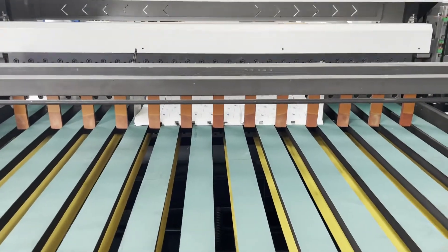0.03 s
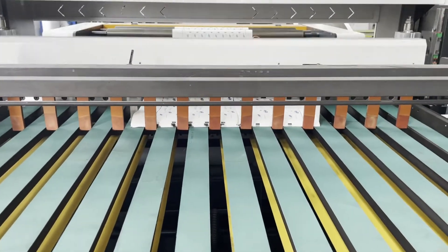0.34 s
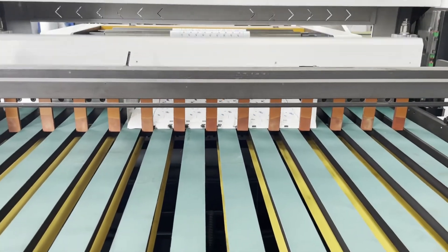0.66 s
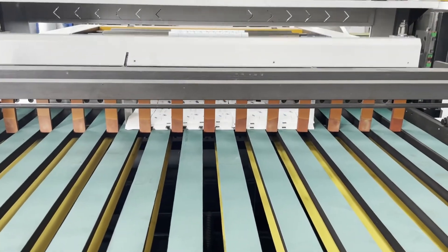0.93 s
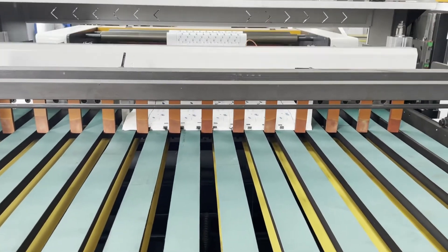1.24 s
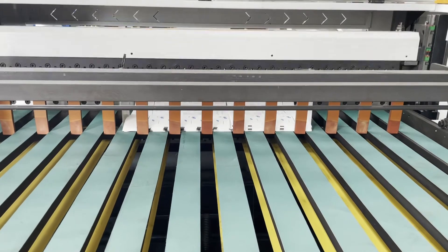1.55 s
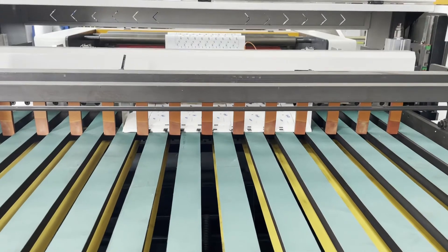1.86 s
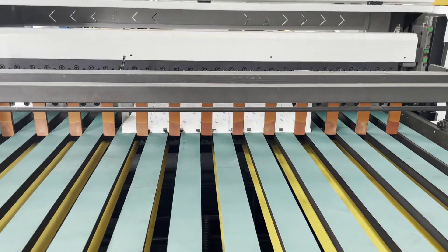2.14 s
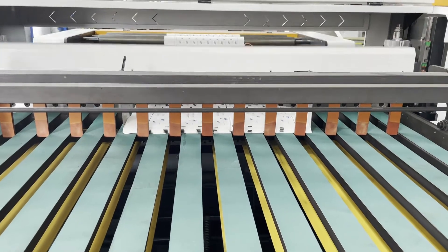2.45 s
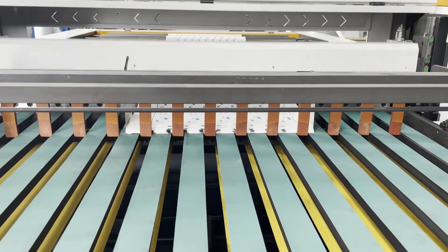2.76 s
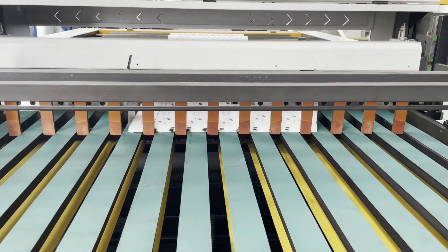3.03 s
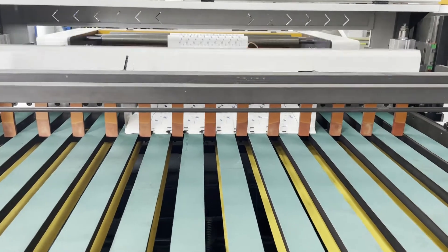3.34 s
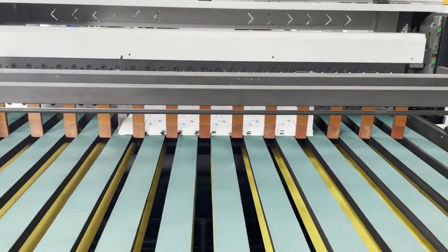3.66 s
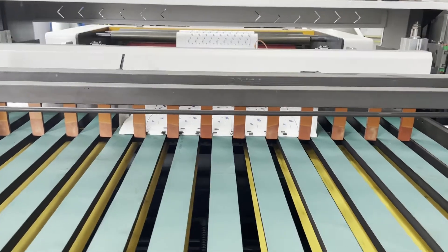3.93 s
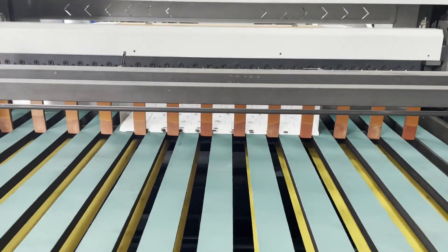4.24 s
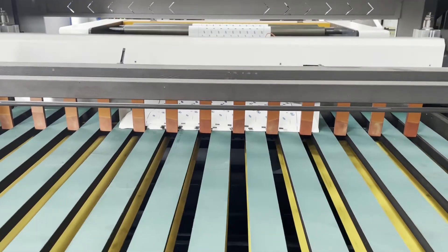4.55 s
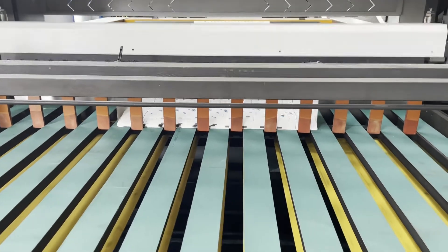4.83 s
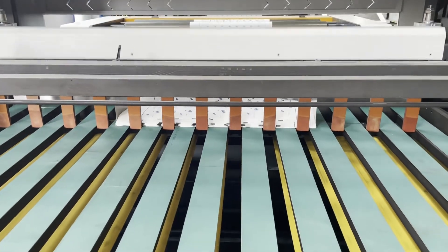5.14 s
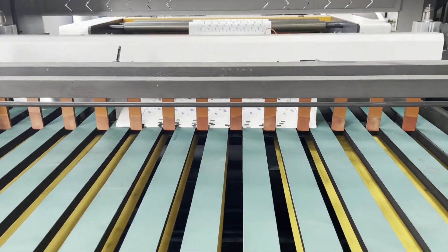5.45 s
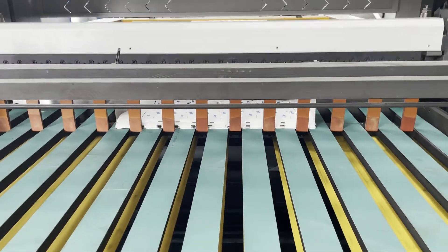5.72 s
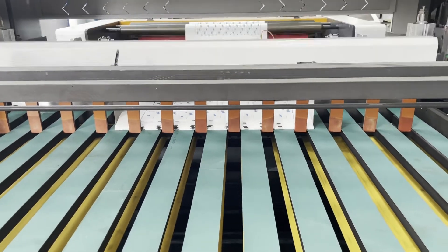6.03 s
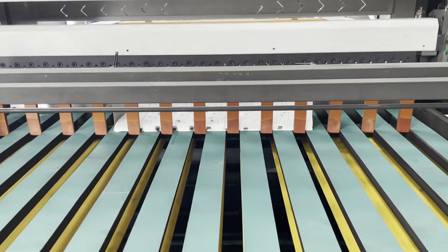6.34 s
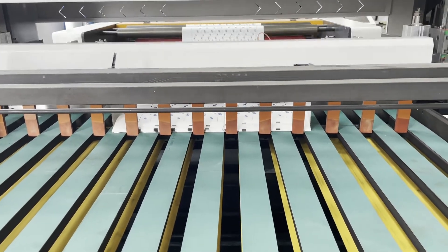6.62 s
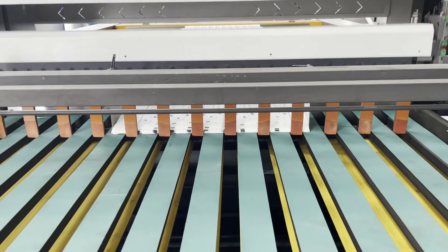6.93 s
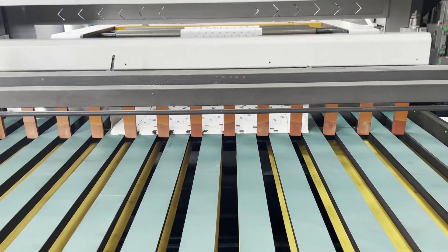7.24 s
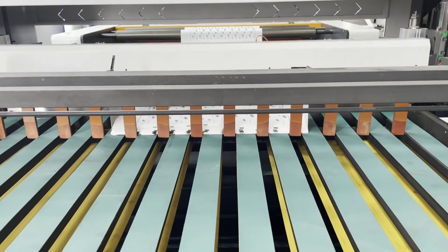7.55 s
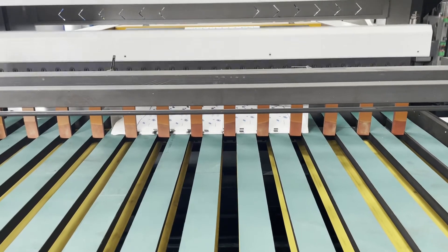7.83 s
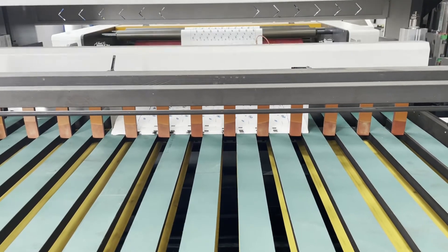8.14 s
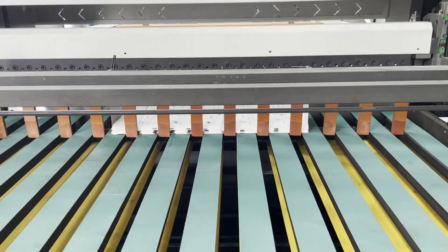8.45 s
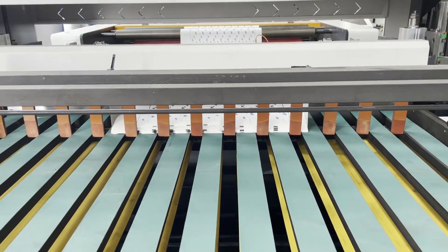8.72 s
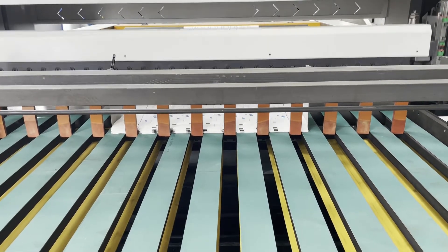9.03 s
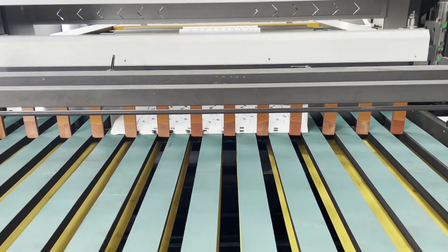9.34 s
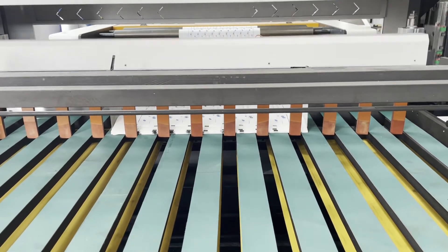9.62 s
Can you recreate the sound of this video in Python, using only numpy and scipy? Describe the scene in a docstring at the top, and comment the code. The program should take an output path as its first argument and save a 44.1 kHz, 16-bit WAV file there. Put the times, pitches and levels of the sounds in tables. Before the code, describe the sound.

A sheet cutting press runs in a factory hall, heard close to its delivery belts. Gears drone and the frame hums while strokes come almost twice a second, each thumping, clattering and swishing a sheet out as a valve hisses. A brief note sings at two seconds. Near four a sheet rasps and the drone firms up. At the end an air jet swells, a roller squeals and metal parts chirp.

```python
"""A sheet cutting press runs in a factory hall, almost two strokes a second, close by its delivery belts.
From the start gears drone and the frame hums; each stroke thumps, clatters through the cut and throws
a sheet out, while a valve switches air. At 2 s a brief note sings. Near 4 s a sheet rasps along its
guides and the drone firms up. At the end an air jet swells, a dry roller squeals and metal parts chirp."""
import sys
import numpy as np
from scipy.fft import rfft, irfft, next_fast_len
from scipy.io import wavfile
from scipy.ndimage import map_coordinates

SR = 44100
rng = np.random.default_rng(int(sys.argv[2]) if len(sys.argv) > 2 else 0)


def materialize(psi):
    """Save the field psi as 16-bit PCM at rate SR to the path in sys.argv[1].

    A 1-D psi becomes a single channel; in a 2-D psi each row is a channel.
    """
    bounded = np.clip(np.atleast_2d(psi).T, -1, 1)
    quanta = np.round(bounded * 32767).astype(np.int16)
    wavfile.write(sys.argv[1], SR, quanta)


N = 435708
TIME = np.arange(N) / SR
STROKE_S, FIRST_STROKE_S = .52708, .42
CUT_S, RELEASE_S = .14, .185  # into the stroke: the middle of the cut, the platen letting go

# Strokes of the platen: t/s, thump/dB, cut force/dB, cut length/s, guard ring in the cut/dB,
# guard ring on release/dB, paper swish/dB, gripper snap/dB, extra gear jolt/dB
STROKES = [(-0.107, -24, -1, .02, -25.5, -40, 0, -4, -3), (0.42, -21.5, 0.5, .025, -33, -37, -1.4, -4, 4),
           (0.947, -22, -1.5, .02, -25, -28, 0.5, -1.5, -3), (1.474, -22, 0, .03, -31, -29, -1, -2, 0.5),
           (2.001, -23, 1.5, .03, -31, -35, -2, -1.5, 2),
           (2.529, -25.5, -0.5, .03, -25, -30, -0.5, -2.5, -9),
           (3.055, -24, 0, .035, -25.5, -21.5, -3, -1, 4.5), (3.582, -22, -3, 0.042, -27, -29, -1, -0.5, 0),
           (4.111, -21, -.5, 0.041, -19, -28, -1.5, 0, 2.5),
           (4.637, -21.5, .5, .05, -34, -29, 1.5, -1, 0.5), (5.164, -21, 0, 0.056, -25, -34, -1, -2, -1),
           (5.691, -20, 0, 0.067, -22.5, -28, 0, 0, 2), (6.218, -22, -.5, .065, -24, -29, 2.5, -1.5, -2),
           (6.745, -23, 2, .07, -22.5, -30, 0.5, -1.5, 1), (7.271, -25.5, 2.5, 0.057, -24, -29, -.5, 0, 0),
           (7.8, -21.5, 1.5, 0.045, -25.5, -41, -0.5, -1.5, 1),
           (8.326, -22, 2, .06, -20.5, -31, -0.5, 0.5, 0),
           (8.852, -20.5, 2.5, 0.042, -18.5, -34, -.5, -1, -2.5),
           (9.379, -23.5, 2, 0.062, -23.5, -35, 0, 0, 0)]
# Cams jolt the gears as they go slack, take up the platen and drive it home (offsets count from the
# start of each stroke): offset/s, lift of the weak drone/dB, lift of the firm drone/dB, width/s
CAM_JOLTS = [(.012, -2.5, -6.5, .018), (.045, 3, 6, .02), (.11, -2, 3, .012), (.14, -12, -8, .013),
             (.178, 7.5, 5, 0.02)]
# Thuds of the heavy bed: offset/s, f/Hz, level over the thump/dB, rise/s, t60/s
BED_THUDS = [(.012, 92, -14, .012, .09), (.047, 84, -5, .013, 0.14), (.089, 108, -2, 0.0091, 0.092),
             (.088, 91, -1.5, 0.035, 0.53), (.14, 174.5, -5, 0.037, 0.32), (.185, 222, -9, 0.019, 0.29),
             (.27, 175.5, -8, 0.023, 0.28), (.358, 92, -11, .012, .1), (0.411, 100, -13.5, 0.056, 0.2)]
# Knocks on the guard: offset/s, f/Hz, level over the stroke's ring/dB, rise/s, t60/s
GUARD_KNOCKS = [(.116, 378.3, 1, 0.0075, 0.092), (.158, 405, -0.5, 0.019, 0.17),
                (.208, 400, -0.5, .018, .2), (.247, 387.5, 2.5, 0.019, 0.095)]
# Grippers and cams snap, the sheet slides out: offset/s, relative level/dB, rise/s, hold/s, t60/s
GRIPPER_SNAPS = [(.002, -6, .008, .004, .15), (0.352, -1.5, .007, .032, 0.09),
                 (0.476, -4.5, .005, .002, 0.078)]
# Sheets coming down on the belts: t/s, slap/dB, crackle/dB
LANDINGS = [(.265, -2, -9), (.792, -2, -3), (1.306, -7, -4), (1.836, -2, -9), (2.364, -2.5, -5),
            (2.884, -5, -3), (3.417, -5, -3), (3.955, -1, -4), (4.488, -4, -6), (5.015, -3, -2),
            (5.528, -7, -1), (6.062, -2, -6), (6.585, -5, -7), (7.115, -6, -4), (7.638, -2, -4),
            (8.175, -3, -4), (8.695, -6, -5), (9.225, -6, -5), (9.755, -4, -6)]
# Whirs of the sheet transport: offset/s, f/Hz, level/dB, width/s
WHIRS = [(.02, 612, -34.5, 0.025), (.19, 619, -37, 0.064)]
# Its groans, mostly on the return: t/s, width/s, f/Hz, level/dB
GROANS = [(.07, .05, 599, -34), (.25, 0.043, 670, -29), (.81, 0.049, 717, -29), (1.35, 0.07, 682, -36),
          (1.65, 0.057, 577, -29.5), (1.82, 0.091, 680, -29), (2.38, 0.055, 714, -30.5),
          (2.74, .05, 615, -28), (2.95, 0.097, 691, -31.5), (3.42, .08, 693, -34), (3.93, 0.1, 701, -33),
          (4.52, 0.045, 690, -28.5), (4.69, 0.038, 606, -29.5), (5.48, 0.1, 688, -27.5),
          (6.04, 0.1, 691, -32), (6.6, 0.072, 687, -31), (7.08, 0.086, 680, -30.5), (7.63, 0.062, 660, -27),
          (8.2, 0.078, 696, -33), (8.7, 0.085, 690, -36), (9.2, .09, 684, -29.5), (9.77, 0.074, 698, -35)]
# Whine of the motor's inverter: f/Hz, level/dB
INVERTER_TONES = [(4885, -63), (7558, -69), (7924, -62), (7972, -59), (7999, -61), (8031, -65), (8074, -65),
                  (8424, -68), (11886, -71), (12116, -72)]
# Edge tones of the air jet: f/Hz, relative level/dB
EDGE_TONES = [(3090, -47), (4480, -48), (6450, -51), (10070, -50), (10900, -48)]
# Surges of the dry roller: t/s, length/s, note/dB, octave/dB
SQUEALS = [(9.261, .018, -32.5, -54), (9.278, .035, -42, -39), (9.32, .04, -45, -42.5),
           (9.372, .04, -46, -40), (9.415, .025, -44, -47), (9.445, .035, -37, -46), (9.49, .038, -36, -47),
           (9.56, .05, -47, -52), (9.646, .035, -35.5, -57), (9.695, .03, -44, -55),
           (9.755, .025, -37, -50), (9.774, .04, -48, -42), (9.815, .025, -40, -49)]
# Metallic chirps: t/s, width/s, f/Hz, level/dB
CHIRPS = [(9.22, .02, 2260, -41), (9.68, .04, 6072, -48), (9.70, .05, 5566, -48), (9.72, .06, 6498, -49),
          (9.757, .013, 3074, -35), (9.81, .04, 4470, -45)]
# Resonances of the steel frame and its covers: f/Hz, width/Hz, lift/dB
COVER_MODES = [(94.5, 11, 2), (172, 25, 6.5), (342, 17, 4), (692, 59, 5), (852, 22, 6.5), (943, 35, 4.5),
               (1307, 7, 5.5), (1440, 12, 0.5), (1992, 32, 3.5), (2290, 140, 2.5), (3930, 340, 4),
               (4880, 19, 6)]
# Tone colours of the noise layers: f/Hz, spectral level/dB
DIE_EQ = [(60, -70), (120, -59), (230, -58), (290, -54.5), (400, -53.5), (520, -56.5), (800, -61),
          (1300, -59.5), (1900, -72), (3000, -75.5), (8000, -101), (15700, -110)]
SWISH_EQ = [(1200, -100), (2600, -86), (4000, -72), (6000, -76), (8500, -78.5), (12000, -84.5),
            (15700, -91)]
GRIPPER_EQ = [(100, -81), (400, -54), (900, -62.5), (1500, -67), (2300, -67), (3100, -70), (4000, -71.5),
              (6000, -77), (9000, -80), (15700, -96)]
SLAP_EQ = [(100, -75), (400, -68), (900, -56.5), (1500, -65.5), (2300, -74.5), (3100, -77), (4000, -78),
           (6000, -84), (9000, -92), (15700, -96)]
CRACKLE_EQ = [(600, -90), (1500, -64.5), (2300, -62), (3200, -73.5), (6000, -92), (15700, -110)]
VALVE_EQ = [(1000, -105), (4000, -96), (6500, -81.5), (7800, -83.5), (8800, -84), (10000, -83),
            (12000, -90), (14000, -83), (15700, -95)]
RASP_EQ = [(150, -75), (400, -50.5), (600, -59), (1050, -59.5), (1600, -67.5), (2200, -64.5), (3200, -84),
           (6000, -88), (15000, -100)]
JET_EQ = [(150, -70), (500, -47.5), (1200, -63), (2800, -65), (4200, -67.5), (7000, -69.5), (10000, -73),
          (13000, -78), (15700, -86)]
SHAFT_EQ = [(15, -104), (28, -92), (48, -55.5), (70, -54.5), (115, -52.5), (200, -55.5), (270, -54.5),
            (350, -50), (450, -55), (540, -64), (800, -75), (2000, -110)]
BELT_EQ = [(100, -71), (400, -68.5), (620, -56.5), (800, -64.5), (1150, -64), (1500, -65), (1800, -71),
           (2600, -70.5), (3300, -74.5), (4600, -75.5), (6000, -82.5), (8200, -87.5), (11500, -88.5),
           (15700, -97)]
# Likeness of left and right in the noise layers: f/Hz, correlation
STEREO_LIKENESS = [(25, .88), (70, .97), (140, .94), (330, .84), (500, .72), (1000, .56), (1900, .3),
                   (4000, .56), (6000, .6), (8000, .82), (15000, .87)]
# Phase between the sides: f/Hz, lead of the left/rad
STEREO_LEAD = [(1000, 0), (2240, -.6), (3190, .7), (3880, -.1), (4910, .4), (6200, -.2), (8100, -3.1),
               (9500, -4.4), (11500, -6.3), (15000, -9.4)]
# Balance of the sides: f/Hz, left minus right/dB
STEREO_BALANCE = [(60, -4), (110, 1.3), (200, -2.1), (380, -1.5), (700, 0.5), (1290, 0.9), (2380, 1),
                  (4400, 1), (8120, 2), (15000, -1)]


def gears(teeth_per_stroke=168, speed_swing=.0272, firm_at_s=4.04, firm_over_s=.37, shudder_hz=14.7):
    """The mesh tone sags and surges with the crank; cams jolt it and teeth rattle in their backlash."""
    starts, *_, home_db = np.transpose(STROKES)
    speed = np.cos(2 * np.pi * since(.3002) / STROKE_S)  # the crank slows for the cut, then picks up
    mesh_hz = teeth_per_stroke / STROKE_S * (1 + speed_swing * speed) + 1.15 * wobble(90)
    firm = np.clip((TIME - firm_at_s) / firm_over_s + .5, 0, 1)  # 0: weak and broken, 1: firm
    jolt_db = sum((weak_db + firm * (firm_db - weak_db)) * bump(at_s, width_s)
                  for at_s, weak_db, firm_db, width_s in CAM_JOLTS)
    jolt_db += np.interp(TIME, starts + .19, home_db) * bump(.19, .02)  # driving the platen home
    shudder = np.cos(2 * np.pi * shudder_hz * around(.1185))  # the shaft shakes around the cut
    shudder_db = 1.5 * bump(.1185, width_s=.29) * shudder
    backlash_db = (1.2 + 1.5 * (1 - firm)) * wobble(40)
    level_db = -29.5 + 4 * firm + 1.3 * speed + jolt_db + shudder_db + backlash_db
    return amp(level_db) * tone(mesh_hz, unsteady=.19)


def frame(hum_cycles_per_stroke=75):
    """The frame hums as the platen pushes it and pulls it back; the heavy bed thuds underneath."""
    thump_db = np.transpose(STROKES)[1]
    push = amp(-25) * bump(CUT_S, width_s=.096)
    pull = amp(-29) * bump(.44, width_s=.12)
    hum = (push - pull) * amp(.32 * wobble(9.2)) * tone(hum_cycles_per_stroke / STROKE_S, unsteady=.15)
    bed = sum(blows(thump_db + db, at_s, rise_s, t60, hz=hz, detune=.013)
              for at_s, hz, db, rise_s, t60 in BED_THUDS)
    return hum + np.sqrt(2) * bed


def guard(wander_hz=11, buzz_db=1.1):
    """A loose steel guard is knocked twice by the cut and twice more as the platen lets go."""
    cut_db, release_db = np.transpose(STROKES)[4:6]
    out = np.zeros(N)
    for at_s, hz, db, rise_s, t60 in GUARD_KNOCKS:
        ring_db = release_db if at_s > RELEASE_S else cut_db
        knocks = blows(ring_db + db, at_s, rise_s, t60) * amp(buzz_db * wobble(70))
        out += knocks * tone(hz + wander_hz * wobble(40), unsteady=.32)
    return out


def cutting():
    """The dies clatter through the cut and the paper swishes."""
    _, _, force_db, length_s, _, _, swish_db, _, _ = np.transpose(STROKES)
    dies = blows(force_db, CUT_S - length_s / 2, rise_s=.027, t60=.49, hold_s=length_s)
    dies = dies * rattle(rate=1500, share=.16) * amp(-.74 + 1.2 * wobble(110))
    paper = blows(swish_db, CUT_S, rise_s=.062, t60=.48)
    paper = paper * rattle(rate=900, share=.17) * amp(2.1 * wobble(110))
    return radiate(dies, DIE_EQ) + radiate(paper, SWISH_EQ)


def grippers():
    """The grippers and their cams snap three times a stroke, letting the sheet slide out."""
    snap_db = np.transpose(STROKES)[7]
    snaps = sum(blows(snap_db + db, at_s, rise_s, t60, hold_s)
                for at_s, db, rise_s, hold_s, t60 in GRIPPER_SNAPS)
    return radiate(snaps * rattle(rate=1000, share=.099), GRIPPER_EQ)


def landing():
    """Each thrown sheet slaps and crackles onto the belts, a little earlier or later in the stroke."""
    times, slap_db, crackle_db = np.transpose(LANDINGS)
    at_s = times - np.transpose(STROKES)[0]
    slap = blows(slap_db, at_s, rise_s=.012, t60=.1, hold_s=.015) * rattle(rate=810, share=.15)
    crackle = blows(crackle_db, at_s, rise_s=.006, t60=.09, hold_s=.012) * rattle(rate=700, share=.25)
    return radiate(slap, SLAP_EQ) + radiate(crackle, CRACKLE_EQ)


def transport():
    """The sheet transport rubs: two whirs in every stroke, and groans that come and go."""
    whir = sum(bump(at_s, width_s) * amp(db) * rubbing(hz) for at_s, hz, db, width_s in WHIRS)
    times, _, pitches, _ = np.transpose(GROANS)
    hold_edges = np.column_stack([times - .08, times + .08]).ravel()
    groan_hz = np.interp(TIME, hold_edges, np.repeat(pitches, 2))  # hold each pitch, glide to the next
    swells = sum(amp(db - .6) * swell(t, width_s) for t, width_s, _, db in GROANS)
    return whir + swells * rubbing(groan_hz)


def rubbing(hz, wander_hz=9, chatter_hz=21, rough_db=3):
    """A rough rubbing note that wanders slowly in pitch and chatters quickly."""
    roughness = amp(rough_db * wobble(110))
    return roughness * tone(hz + wander_hz * wobble(18) + chatter_hz * wobble(130), unsteady=.43)


def air_valve(nozzle_hz=12715, sag_hz=800, settle_s=.115, fade_db=-6):
    """Stored air puffs, then hisses through the open valve; the nozzle's whistle sinks with pressure."""
    t = since(.514)
    opening = gate(t, attack_s=.012, hold_s=.404, release_s=.02)
    puff = amp(-1) * np.exp(-(t / .016) ** 2)
    flow = np.maximum(opening * (1 + puff), amp(-9.5))  # the shut valve still leaks
    hiss = radiate(white() * flow * amp(-.3 + .3 * wobble(17)), VALVE_EQ, ringing=False)
    whistle_hz = nozzle_hz + sag_hz * np.exp(-t / settle_s) + 25 * wobble(3) + 45 * wobble(300)
    whistle_db = -59.5 + fade_db * TIME / TIME[-1] + 3.6 * wobble(18) + 1.5 * wobble(2.6)
    build = np.minimum(t / .12, 1)
    return hiss + opening * build * amp(whistle_db) * tone(whistle_hz, unsteady=1.8)


def sheet_rasp(peak_s=3.83, rise_s=.55, fall_s=.35):
    """A sheet rubs on the guides in many small slips, swelling and fading once."""
    t = TIME - peak_s
    pressure = np.exp(-(t / np.where(t < 0, rise_s, fall_s)) ** 2)
    return radiate(pressure * amp(1.6 * wobble(50)) * rattle(rate=550, share=.27), RASP_EQ)


def air_jet(full_s=9.84, growth_db_per_s=12, waver_hz=35):
    """A jet opens into a bright, sputtering hiss, coloured by nearby panels, and whistles on edges."""
    level_db = -1.7 + growth_db_per_s * np.minimum(TIME - full_s, 0)
    edge_db = 1.76 * level_db  # the edge tones grow faster than the hiss
    whistles = sum(amp(db + edge_db + 3.3 * wobble(25)) * tone(hz + waver_hz * wobble(13), unsteady=.9)
                   for hz, db in EDGE_TONES)
    hiss = white() * amp(level_db + 1.7 * wobble(25))
    return whistles + radiate(hiss, JET_EQ, ringing=False, echo_db=-11)


def roller_squeal(pitch_hz=2667, sharp_hz=129, settle_s=.007):
    """Stick and slip sings a rough note and its octave, dropping onto pitch as it first catches."""
    note, octave = np.zeros((2, N))
    for start, length_s, db, octave_db in SQUEALS:
        surge = gate(TIME - start, attack_s=.0076, hold_s=length_s, release_s=.011)
        note += amp(db) * surge
        octave += amp(octave_db) * surge
    catch = np.exp(-np.maximum(TIME - SQUEALS[0][0], 0) / settle_s)
    hz = pitch_hz + sharp_hz * catch + 5 * wobble(16) + 9 * wobble(700)
    roughness = amp(.7 * wobble(160))
    return roughness * (note * tone(hz, unsteady=.3) + octave * tone(2 * hz, unsteady=.55))


def chirps(waver_hz=18, flutter_db=2):
    """Dry metal parts chirp briefly, each at its own pitch."""
    out = np.zeros(N)
    for t, width_s, hz, db in CHIRPS:
        envelope = swell(t, width_s) * amp(db + flutter_db * wobble(60))
        out += envelope * tone(hz + waver_hz * wobble(40), unsteady=.4)
    return out


def singing(start_s=1.99, hz=888):
    """One brief, fluttering note swells out of the machine and fades."""
    envelope = gate(TIME - start_s, attack_s=.1, hold_s=.23, release_s=.053)
    return envelope * amp(-37.5 + 3.7 * wobble(30.7)) * tone(hz, unsteady=.48)


def shafts_and_belts():
    """Shafts rumble and belts rustle without a pause."""
    rumble = radiate(white() * amp(.56 * wobble(11)), SHAFT_EQ)
    rustle = rattle(rate=450, share=.098) * amp(.14 * wobble(2.92) + .98 * wobble(25))
    return rumble + radiate(rustle, BELT_EQ)


def inverter():
    """The motor's inverter lays a thin, steady whine over the top."""
    return sum(amp(db) * tone(hz, unsteady=.48) for hz, db in INVERTER_TONES)


def blows(levels_db, at_s, rise_s, t60, hold_s=0, hz=0, detune=0):
    """One hit a stroke: it peaks at_s into the stroke, holds and dies away; given a pitch, it rings."""
    out = np.zeros(N)
    peaks = np.transpose(STROKES)[0] + at_s
    chances = rng.standard_normal(len(STROKES))
    for peak, hold, db, chance in np.broadcast(peaks, hold_s, levels_db, chances):
        near = slice(*np.searchsorted(TIME, [peak - STROKE_S, peak + hold + t60]))
        t = TIME[near] - peak
        attack = np.exp(-(np.minimum(t, 0) / rise_s) ** 2)
        decay = amp(db - 60 * np.maximum(t - hold, 0) / t60)
        out[near] += attack * decay * np.cos(2 * np.pi * hz * (1 + detune * chance) * t)
    return out


def radiate(noise_pair, eq, ringing=True, echo_db=-20):
    """Colour two noises with an EQ, panel echoes and, if ringing, the covers; spread them in stereo."""
    echoes = np.zeros(SR // 30)
    echoes[rng.integers(SR // 500, len(echoes), size=8)] = amp(echo_db)
    echoes[0] = 1  # the direct sound
    def response(hz):
        gain = amp(along(eq, hz)) * np.sqrt(SR / 2)
        gain = gain * rfft(echoes, 2 * (len(hz) - 1)) / np.linalg.norm(echoes)
        for centre, width, db in COVER_MODES if ringing else []:
            resonance = 1j * hz * width / (centre ** 2 - hz ** 2 + 1j * hz * width)
            gain *= 1 + (amp(db) - 1) * resonance
        spread = np.arccos(np.clip(along(STEREO_LIKENESS, hz), -1, 1)) / 2
        return gain * np.array([np.cos(spread), np.sin(spread)])
    mid, side = filtered(noise_pair, response)
    return np.array([mid + side, mid - side])


def rattle(rate, share):
    """Noise with a share of its power in tiny separate contacts, rate a second."""
    contacts = white() * (rng.random(N) < rate / SR) * np.sqrt(SR / rate)
    return np.sqrt(share) * contacts + np.sqrt(1 - share) * white()


def tone(hz, unsteady):
    """A sine of rms 1 whose phase wanders by about `unsteady` radians."""
    return np.sqrt(2) * np.sin(2 * np.pi * np.cumsum(hz + np.zeros(N)) / SR + unsteady * wobble(25))


def white():
    """Two unrelated white noises."""
    return rng.standard_normal((2, N))


def wobble(rate):
    """A smooth random curve, rate knots a second."""
    return map_coordinates(rng.standard_normal(int(N * rate / SR) + 4), [TIME * rate])


def since(at_s):
    """Time since the crank last passed the point at_s into the stroke."""
    return (TIME - FIRST_STROKE_S - at_s) % STROKE_S


def around(at_s):
    """Time before (-) or after (+) the crank's nearest passing of at_s."""
    return since(at_s - STROKE_S / 2) - STROKE_S / 2


def bump(at_s, width_s):
    """A bell-shaped swell in every stroke."""
    return np.exp(-(around(at_s) / width_s) ** 2)


def swell(peak_s, width_s):
    """A single bell-shaped swell."""
    return np.exp(-np.minimum(((TIME - peak_s) / width_s) ** 2, 20))


def gate(t, attack_s, hold_s, release_s):
    """An envelope that opens at t = 0 and dies away from hold_s on."""
    return np.clip(t / attack_s, 0, 1) * np.exp(-np.maximum(t - hold_s, 0) / release_s)


def filtered(x, response):
    """Shape x with a frequency response."""
    size = next_fast_len(N + SR // 2)
    return irfft(rfft(x, size) * response(np.fft.rfftfreq(size, 1 / SR)), size)[..., :N]


def along(points, hz):
    """Join (f/Hz, value) points on a log frequency axis."""
    freqs, values = np.transpose(points)
    return np.interp(np.log(hz + 1), np.log(freqs + 1), values)


def amp(db):
    """Decibels to gain."""
    return 10 ** (np.asarray(db) / 20)


def scene():
    """The mix: the running machine, the work of each stroke and the passing accents."""
    machine = gears() + frame() + guard() + transport() + inverter() + shafts_and_belts()
    work = cutting() + grippers() + landing() + air_valve()
    accents = sheet_rasp() + singing() + air_jet() + roller_squeal() + chirps()
    return machine + work + accents


def record(dry, top_hz=15750):
    """Set left and right apart in level and phase, and cut everything above top_hz."""
    def sides(hz):
        left = amp(along(STEREO_BALANCE, hz) / 2) * np.exp(.5j * along(STEREO_LEAD, hz))
        return np.array([left, 1 / left]) * (hz < top_hz)
    return filtered(dry, sides)


dry = scene()
out = record(dry)
materialize(out)
```